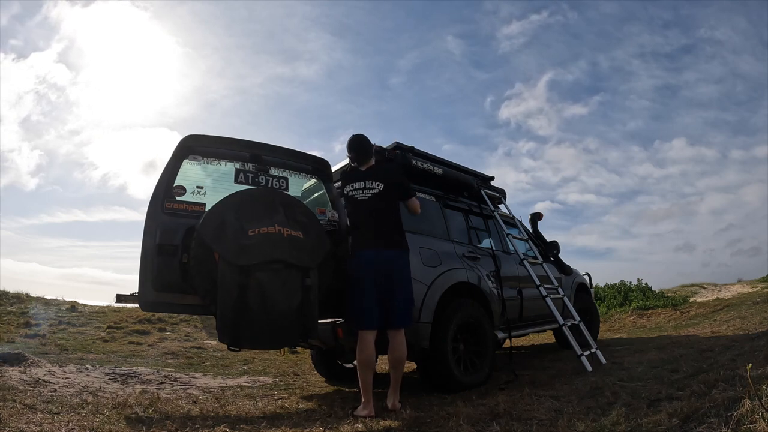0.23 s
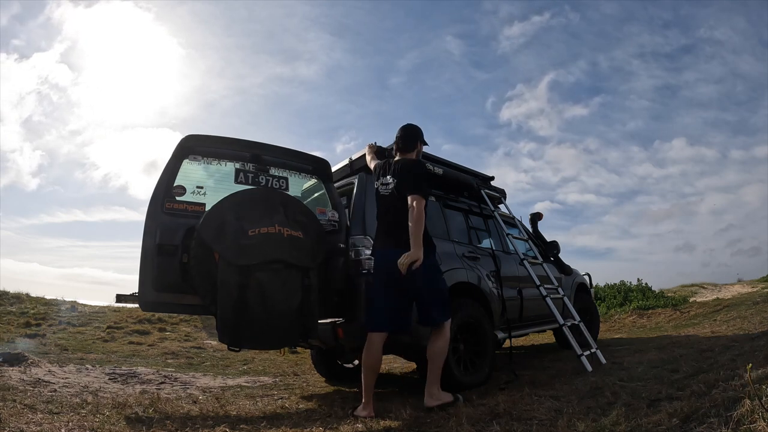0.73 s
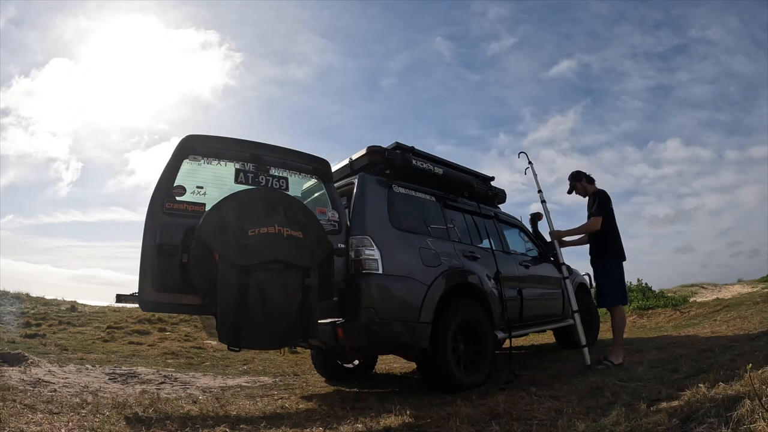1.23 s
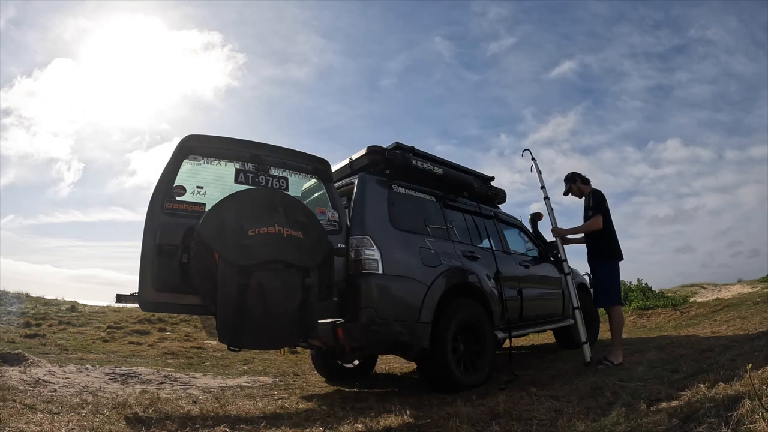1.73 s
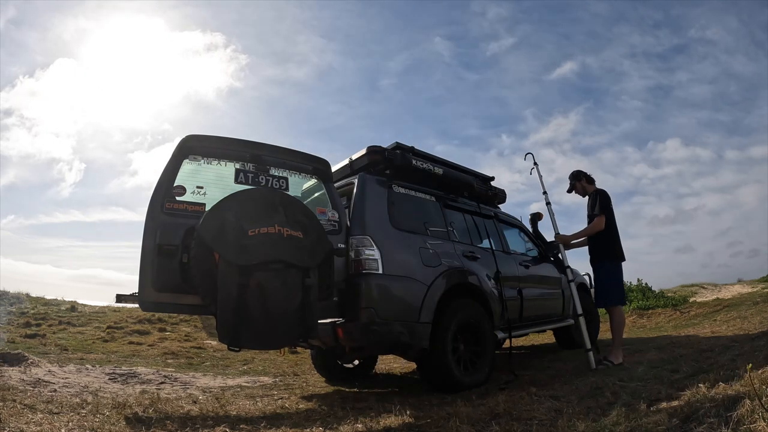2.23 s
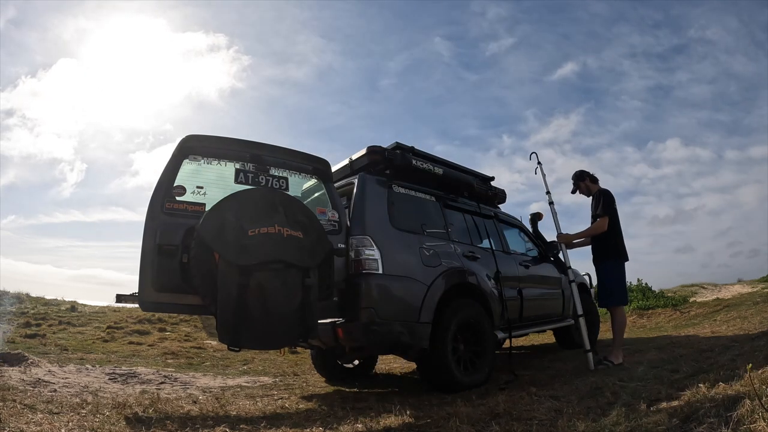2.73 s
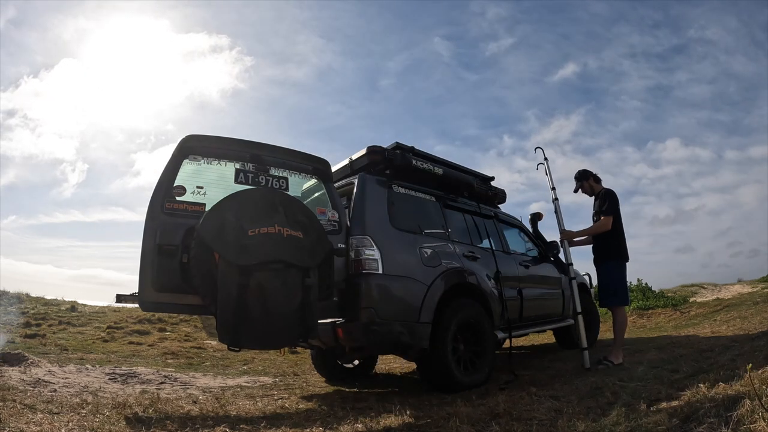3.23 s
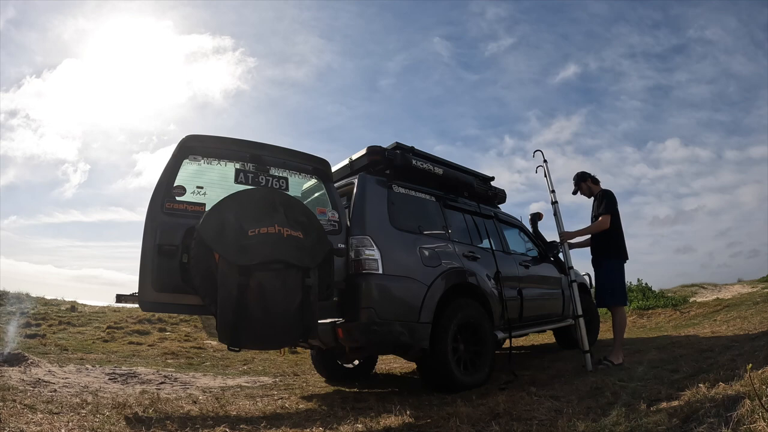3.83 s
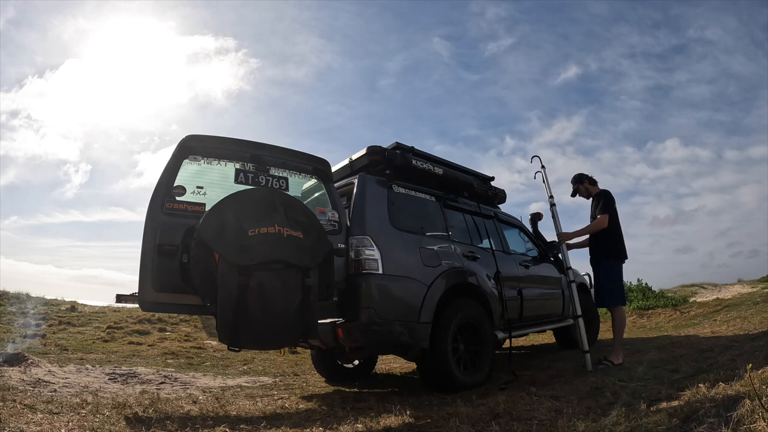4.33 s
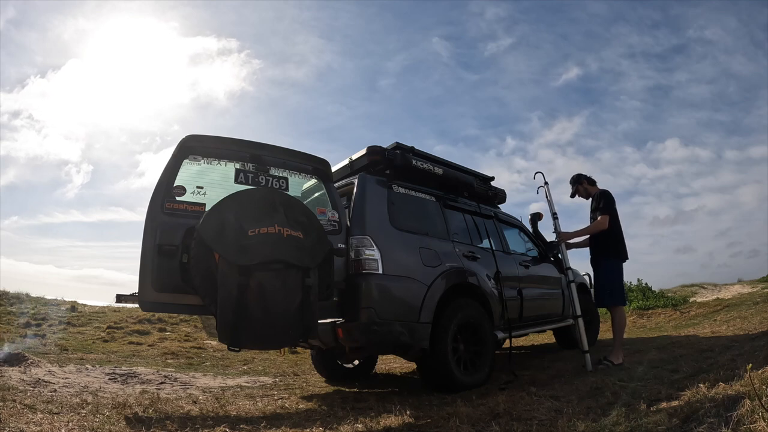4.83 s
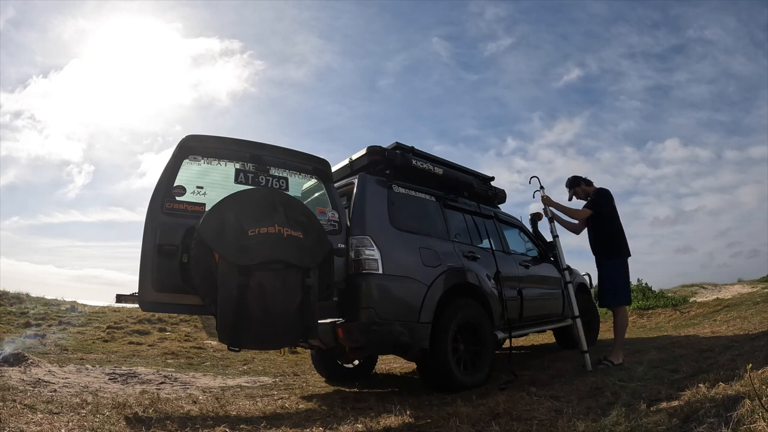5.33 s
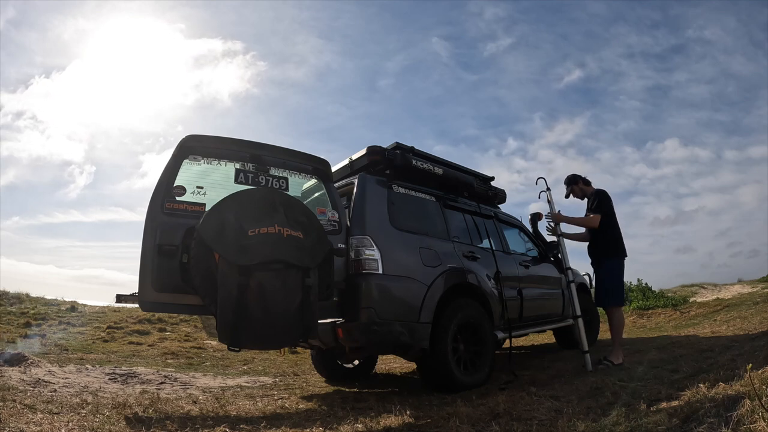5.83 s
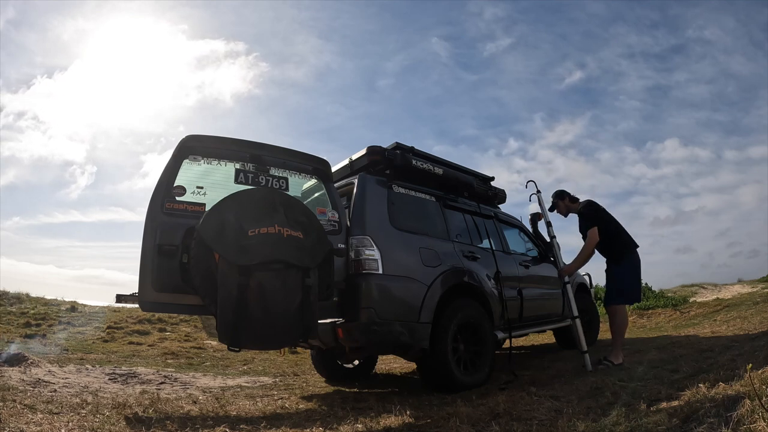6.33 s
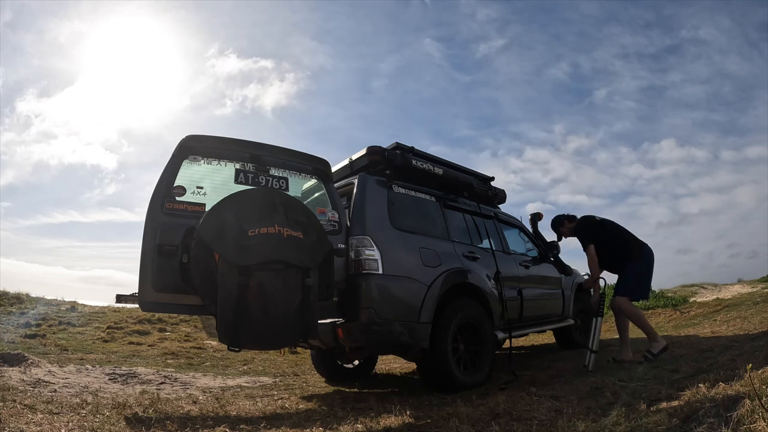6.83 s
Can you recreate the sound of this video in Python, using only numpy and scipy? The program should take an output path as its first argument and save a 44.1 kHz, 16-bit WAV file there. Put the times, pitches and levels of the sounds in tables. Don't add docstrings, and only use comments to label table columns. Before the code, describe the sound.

Outdoors, a small stereo microphone picks up low, lumpy wind rumble over a very faint distant hiss of grass and surf. At 0 s a car door shuts with a short hard thud; a thin insect buzz lies to the left and the wind gusts until an abrupt cut at 1.0 s. The wind drops and an aluminium telescopic ladder is collapsed, close and slightly right. Tubes scrape briefly, then slam with bright, dry, clicking clacks at about 1.2, 1.6, 2.0, 2.4, 2.8, 3.2 and 3.6 s, each trailed by snapping pins, loose rattle and tiny latch squeaks, with short echoes off the car. From 3.7 s only lighter taps remain, around 4.4 and 4.9 s, then a cluster of knocks at 5.4-5.6 s. Wind rises; another cut thumps softly at 6.4 s. Faint distant bird notes, gently falling in pitch, run from 6.6 s to the end at about 7.1 s.

```python
import sys
import numpy as np
from scipy import signal
from scipy.fft import rfft, irfft, next_fast_len
from scipy.io import wavfile
from scipy.ndimage import uniform_filter1d, map_coordinates

SR = 44100
rng = np.random.default_rng(int(sys.argv[2]) if len(sys.argv) > 2 else 0)


def makeup_ratio(level_db):
    decades = np.asarray(level_db, float) / 20
    return 10 ** decades


def wrap_up_sound(samples):
    columns = np.atleast_2d(samples).T
    tamed = np.clip(columns, -1, 1)
    steps = np.round(tamed * 32767).astype(np.int16)
    wavfile.write(sys.argv[1], SR, steps)


N = 313110

# time in seconds, level of the buffeting in dB.
WIND = [(0, -34.5), (.36, -39), (.46, -28), (.66, -35.5), (1, -32.5), (1.01, -44), (1.45, -45), (2.5, -47),
        (3.05, -44.5), (3.5, -41.5), (4.28, -48), (4.45, -42), (4.78, -45), (5.05, -40.5), (5.85, -38),
        (6.35, -35), (6.6, -34), (7.1, -42)]
# frequency in Hz, level in dB per Hz.
BUFFET = [(12, -26), (24, -6), (40, 0), (80, 0), (110, -9), (160, -30), (400, -120)]
# frequency in Hz, level in dB per Hz.
RUMBLE = [(20, -74), (50, -5), (90, -3.5), (160, -1.5), (210, -5), (320, -14.5), (460, -22.5), (750, -37),
          (1000, -77), (2000, -120)]
# frequency in Hz, likeness from 0 to 1.
BUFFET_ALIKE = [(30, .86), (70, .975)]
# frequency in Hz, likeness from 0 to 1.
RUMBLE_ALIKE = [(100, .994), (200, .996), (350, .988), (700, .93)]
RUMBLE_DB, RUMBLE_FOLLOWS, CALM_DB = -33.5, 0.38, -40
# time in seconds, level in dB.
FAR_HISS = [(0.0, -52), (2.39, -53.5), (7.1, -52.5)]
# frequency in Hz, level in dB per Hz.
HISS = [(600, -5), (800, -7), (1000, 1), (2000, -6.5), (3500, -13.5), (4300, -19.5), (5300, -29.5),
        (6800, -20), (8800, -32.5), (10500, -33.5), (12300, -43), (14000, -61), (16000, -89)]
# frequency in Hz, likeness from 0 to 1.
HISS_ALIKE = [(600, 0.78), (1400, 0.8), (3000, 0.57), (7000, .65), (12000, 0.28)]

# time in seconds, beats per second, level in dB.
WINGS = [
    (0, 220, -68.5),
    (.3, 250, -69),
    (.4, 250, -70.5),
    (.7, 360, -70.5),
    (1.004, 250, -65.5),
]
# frequency in Hz, level in dB per Hz.
INSECT = [(6500, -36), (8000, -9), (9300, -6), (10000, -4), (10900, -3), (12100, -27), (13200, -11),
          (14000, -25)]

# start in seconds, length in seconds, level in dB.
SLIDES = [(1.123, 0.25, -55), (1.54, 0.22, -49.5), (1.907, 0.19, -47), (2.308, 0.22, -49.5),
          (2.775, 0.16, -46.5), (3.19, 0.19, -56), (3.575, 0.21, -50), (4.305, 0.2, -53),
          (5.375, 0.22, -47.5), (4.44, 0.31, -54.5), (0, 0.06, -61)]
# frequency in Hz, level in dB per Hz.
RUB = [(900, -4), (2000, 4.5), (3500, -1), (5500, -10), (6800, -3), (8500, -14), (9600, -11), (13800, -21),
       (16000, -35)]

# start in seconds, tube level in dB, rung over tube in
# dB, basic fall time of the rattle in seconds, which each part lengthens.
SLAMS = [(.002, -14.5, -6.5, 0.013), (0.015, -37, 2, 0.072), (0.94, -31.5, -11, 0.0087),
         (1.1493, -31, -11, 0.036), (1.1915, -30, -3, 0.049), (1.2021, -24.5, -3.5, 0.088),
         (1.211, -24.5, 2.5, 0.029), (1.5976, -16.5, -4, 0.045), (1.605, -20, -7, 0.024),
         (1.9662, -22.5, -2, 0.085), (1.9724, -12, -5, 0.029), (2.3646, -18, -19, 0.075),
         (2.378, -18, 0, 0.016), (2.7891, -15, -5.5, 0.04), (2.7967, -18.5, -1, 0.027),
         (3.2148, -25.5, -4.5, 0.08), (3.231, -17, -1, 0.04), (3.237, -15, -2, 0.0098),
         (3.6181, -16.5, -5, 0.037), (3.6244, -19, -2.5, 0.05), (4.3617, -42, 3, 0.012),
         (4.435, -37, -3, 0.04), (4.8984, -35, -8, 0.027), (5.464, -36, -4, 0.036),
         (5.5621, -30, -26, 0.035)]
SLAM_PIN_DB, SLAM_LATCH_DB = -11.5, -6.5
# start in seconds, pin level in dB, latch over pin in dB, tube over pin in dB.
SNAPS = [(1.211, -20.5, 1.5, -29), (1.223, -24, -5, 0), (1.2633, -33.5, 4, 2), (1.3063, -35, 3, 2),
         (1.6057, -18.5, -23, -33), (1.6158, -21, -2.5, -12), (1.665, -27.5, -5, -6), (1.6935, -35, 0, -17),
         (1.6988, -22.5, -12, -20), (1.7147, -35, 7.5, 3), (1.984, -14, -9, -20), (2.006, -28, -7, -11),
         (2.0245, -20.5, -5, -16), (2.066, -29, -7.5, -1.5), (2.335, -32, 3.5, -8), (2.378, -23.5, 6.5, -3),
         (2.391, -22, -4, -18), (2.4686, -21.5, -11, -8), (2.473, -32, -16, -2), (2.797, -17.5, 1.5, -18),
         (2.8042, -19, -10, -14), (2.877, -30.5, -1, -12), (2.8896, -33.5, -1, -1), (3.2305, -40, 16, -11),
         (3.279, -30, 10.5, 5.5), (3.2835, -31, -5, -2.5), (3.6251, -19.5, 2.5, -9),
         (3.633, -33.5, 10.5, -6), (5.562, -44.5, 20, -16), (5.568, -34.5, 2, -6)]
SNAP_RUNG_DB = -5.5
SNAP_T60 = 0.017
SNAP_CRACK, CRACK_S = 0.97, 0.00042
# start in seconds,
# tube level in dB, small parts over tube in dB, basic fall time of the rattle in seconds, which each part
LIGHT_KNOCKS = [(1.1432, -41, -3, 0.016), (1.233, -39, -5, 0.15), (1.2812, -34, -4, 0.038),
                (1.549, -44, -0.5, 0.056), (1.566, -39, 2, 0.012), (1.637, -39.5, -2.5, 0.12),
                (1.6855, -36, -11, 0.039), (1.903, -45, 3, 0.05), (1.915, -37.5, -1, 0.04),
                (1.944, -33.5, -4, 0.016), (1.985, -29, -6, 0.026), (2.0387, -40, -1, 0.12),
                (2.078, -35, -4.5, 0.016), (2.313, -33.5, -13, 0.0066), (2.4042, -32.5, -1, 0.1),
                (2.417, -43, 10.5, .026), (2.429, -41.5, 7, 0.049), (2.451, -32.5, 3, 0.028),
                (2.815, -36.5, -15, .09), (2.834, -50, -11, .07), (2.8505, -42, 8, 0.045),
                (2.8635, -41, -14, 0.043), (3.141, -42, -10, .012), (3.181, -36.5, -9, 0.034),
                (3.225, -25.5, 1.5, 0.086), (3.298, -35.5, 2.5, 0.047), (3.337, -37, -5, 0.044),
                (3.642, -45, -10, .032), (3.669, -36, 1, 0.036), (3.728, -36.5, -3, 0.03),
                (.0091, -39, -2, 0.013), (2.7225, -48, -10, 0.023), (2.8814, -49, -3, .021), (3.598, -42, -4, .023),
        (3.6485, -36, -5, 0.054), (3.7483, -41, -4, 0.0045), (4.009, -41, -5.5, 0.019),
        (4.3251, -38.5, -13, 0.026), (4.347, -53, -4, .011), (4.393, -43, -7, 0.03),
        (4.4223, -30.5, -7.5, 0.028), (4.7173, -54, 6.5, 0.01), (4.894, -27.5, -14.5, 0.013),
        (5.397, -44, 1, 0.023), (5.436, -29, -5, 0.021), (5.485, -36, -6, .02),
        (5.4891, -23.5, -6.5, 0.023), (5.6276, -43, -9, .009), (5.641, -44, 3, 0.012),
        (5.855, -43, -6.5, .016), (6.768, -52.5, 1.5, 0.032)]
LOOSE_RUNG_DB, LOOSE_LATCH_DB = -4.5, -1
# frequency in Hz, width in Hz, level in dB.
RUNG = [(984, 160, -9.5), (1450, 320, -2.5), (495, 194, -8)]
# frequency in Hz, width in Hz, level in dB.
TUBE = [(1990, 1130, -2), (2337, 200, 3.5), (2560, 180, -4.5), (2893, 176, 7), (3040, 610, 1),
        (4040, 610, -3)]
# frequency in Hz, width in Hz, level in dB.
PIN = [(3990, 230, -4.5), (4430, 490, 0), (4730, 110, -7), (4800, 350, -3.5)]
# frequency in Hz, width in Hz, level in dB.
LATCH = [(6060, 710, -2.5), (7090, 1050, 5), (7130, 474, 7.5), (7850, 150, -19.5), (10300, 1800, -9.5),
         (11730, 240, -9), (12300, 1700, -21)]
SNAP_TOP_HZ, SLAM_TOP_HZ = 9400, 19100

# start in
# seconds, frequency in Hz, level in dB, time to fall 60 dB in seconds.
METAL_RINGS = [(0.0056, 1290, -12, 0.011), (0.0092, 2120, -27, 0.021), (1.1942, 3940, -26, 0.02),
               (1.2105, 6320, -25, 0.023), (1.2128, 10900, -30, 0.012), (1.216, 4370, -24, 0.018),
               (1.225, 4300, -22, 0.02), (1.606, 3900, -13, 0.012), (1.607, 1440, -32, 0.021),
               (1.611, 9560, -39, 0.021), (1.9719, 3810, -16, 0.016), (1.9738, 8380, -29, 0.022),
               (1.9747, 6780, -30, 0.03), (1.9847, 4480, -22, 0.012), (1.9856, 10300, -32, 0.025),
               (1.9947, 11240, -48, 0.025), (2.366, 1420, -18, 0.012), (2.3738, 5020, -24, 0.025),
               (2.3752, 3460, -17.5, 0.021), (2.3766, 7160, -27, 0.012), (2.3893, 2554, -30, 0.089),
               (2.7906, 6500, -31, 0.015), (2.7964, 1087, -24, 0.042), (2.7974, 10980, -34, 0.019),
               (2.7988, 7700, -26, 0.012), (2.805, 4440, -22, 0.012), (3.2174, 3370, -32, 0.073),
               (3.2174, 1560, -33, 0.072), (3.2301, 4200, -19, 0.012), (3.2333, 3330, -21.5, 0.06),
               (3.623, 2720, -18, 0.014), (3.626, 6300, -26, 0.012), (3.63, 7130, -27, 0.027),
               (3.631, 3290, -23, 0.026), (3.6437, 4330, -30, 0.023),
               (1.1543, 7700, -42, 0.038), (1.2464, 1350, -34, 0.015), (1.2654, 9200, -39, 0.029),
               (1.2664, 4950, -34, 0.018), (1.3057, 7050, -30, 0.019), (1.6727, 5990, -33, 0.014),
               (1.7153, 7210, -34, 0.012), (1.7162, 1370, -39, 0.032), (1.7167, 4400, -30, 0.016),
               (1.9149, 7800, -44, 0.026), (1.9503, 4440, -35, 0.02), (2.0101, 2560, -37, 0.055),
               (2.0255, 4314, -21, 0.028), (2.0255, 10600, -35, 0.013), (2.0732, 4720, -35, 0.019),
               (2.0777, 3680, -38, 0.048), (2.4063, 3100, -23, 0.012), (2.4323, 4950, -34, 0.037),
               (2.4364, 7130, -41, 0.02), (2.4514, 2220, -36, 0.036), (2.4687, 4420, -21, 0.027),
               (2.469, 2930, -19.5, 0.01), (2.854, 2560, -40, 0.1), (2.8809, 6240, -30, 0.019),
               (2.8831, 4340, -38, 0.055), (3.2573, 3240, -30, 0.017), (3.2792, 2560, -28, 0.032),
               (3.294, 2660, -42, 0.096), (3.597, 7940, -37, 0.014), (3.669, 3290, -32.5, 0.064),
               (3.6713, 1420, -33, 0.022), (3.7094, 7160, -40, 0.023), (4.013, 6120, -46, 0.037),
               (4.4246, 3370, -30, 0.014), (4.426, 1240, -29, 0.014), (4.436, 1490, -31, 0.018),
               (4.8958, 1427, -33, 0.033), (5.4396, 2900, -31.5, 0.024), (5.4478, 1680, -41, 0.034),
               (5.412, 9400, -46, 0.02), (1.549, 3270, -43, 0.056), (5.642, 7100, -39, 0.018),
               (5.4664, 1830, -29, 0.02), (5.494, 2610, -19.5, 0.012), (5.494, 5030, -28.5, 0.036),
               (5.504, 4940, -32, 0.026), (5.563, 2990, -29, 0.017), (5.5693, 4630, -28, 0.018),
               (1.599, 3700, -22, 0.045), (1.6, 1412, -29, .05), (1.616, 6100, -23, 0.027),
              (1.969, 3040, -30, 0.056), (1.976, 2294, -24, 0.045), (1.976, 1470, -23, 0.025),
              (2.367, 3000, -27, .06), (2.376, 1027, -28, 0.044), (2.788, 2910, -28, 0.056),
              (2.797, 3270, -28, 0.13), (2.799, 6200, -26, 0.034), (3.238, 1500, -28, 0.016),
              (3.231, 6600, -32, .03), (3.23, 9600, -25.5, 0.021), (3.6238, 1090, -19, 0.042),
              (3.628, 1360, -22, .05), (3.618, 2560, -28, 0.055), (4.8945, 2370, -32.5, 0.037),
              (4.898, 2950, -41, 0.037), (5.49, 1630, -27, 0.022), (5.563, 7900, -28, 0.013),
              (4.426, 2960, -35, .04)]
RING_RISE_S, RING_DB = 0.00031, 1

# start in seconds,
# length in seconds, level in dB.
RUSTLES = [(0.895, 0.018, -58), (1.51, .04, -71), (2.08, 0.047, -70), (2.24, 0.091, -65),
           (2.492, 0.046, -63), (2.741, 0.023, -63), (3.582, 0.019, -55), (3.968, .025, -62),
           (4.128, 0.025, -66), (4.19, .015, -66), (4.874, 0.011, -63), (4.915, 0.011, -67),
           (5.357, .04, -70), (5.58, 0.051, -63), (5.697, 0.0088, -72), (6.475, 0.45, -81), (6.78, .3, -82),
           (6.641, 0.017, -72), (6.69, 0.017, -70), (4.623, .125, -60.5), (6.956, 0.0085, -67),
           (6.978, 0.01, -64), (6.986, 0.011, -72), (7.024, .012, -69)]

# start in seconds, length in seconds, frequency in Hz, level in dB.
SQUEAKS = [(1.106, .016, 7900, -69), (1.151, 0.018, 7800, -47), (1.408, 0.045, 2375, -54.5),
           (1.55, .025, 8000, -48), (1.878, .025, 8000, -58), (1.912, .012, 8000, -47),
           (2.478, .035, 4100, -53), (3.181, .015, 7900, -45), (3.563, .02, 7860, -51),
           (3.585, .0088, 7850, -50), (3.596, .0065, 7860, -39), (3.672, 0.021, 3290, -48),
           (4.003, 0.034, 6200, -55), (4.577, .013, 5000, -55), (4.601, 0.012, 4980, -49),
           (4.615, 0.04, 4920, -57), (4.633, 0.014, 1945, -46), (6.97, 0.013, 3280, -54)]
OVERTONE_DB, OVERTONE_FADE_DB_PER_KHZ = 8, 4.5

# start in seconds, peak level in dB.
CLICKS = [(1.305, -23), (1.6172, -9), (1.6226, -15), (1.6395, -29), (1.6653, -29), (1.6933, -22),
          (1.6998, -19), (1.7151, -23), (1.9844, -9), (2.0051, -21), (2.025, -8.5), (2.0388, -27),
          (2.3911, -9.5), (2.4075, -25), (2.4198, -21), (2.4688, -14), (2.804, -11), (2.8784, -27),
          (2.8905, -17.5), (3.2803, -18), (3.2997, -29), (3.3376, -26), (3.6427, -22), (3.6685, -29),
          (3.7482, -21), (4.7191, -43)]
# frequency in Hz, width in Hz, level in dB.
CLICK_MODES = [(4440, 860, -3), (5700, 990, 1.5), (7160, 1050, 0)]
CLICK_DB = -2.5

# start in seconds, length in seconds, level in dB.
BIRD = [
    (6.61, .03, -65),
    (6.67, .045, -63),
    (6.735, .045, -65),
    (6.86, 0.05, -63),
    (6.91, 0.061, -62),
    (6.973, .07, -59),
    (7.04, 0.06, -61),
]
BIRD_HZ, BIRD_SAG_HZ_PER_S = 2820, 675

# frequency in Hz, time to fall 60 dB in seconds.
CAR_SIDE = [(500, 0.031), (3000, 0.087), (10000, 0.033)]
# frequency in Hz, left over right in dB.
PORT_PAN = [(700, -1.8), (2400, -4), (4400, -4), (8000, -3), (13000, 1.2)]
# frequency in Hz, phase by which left leads in radians.
PORT_LAG = [(300, 0.39), (1600, -0.51), (3000, -0.68), (5000, -0.71), (6500, -0.11), (10000, 0.056),
            (14000, 1)]
# frequency in Hz, level in dB.
TOP = [(14000, 1.5), (14700, -10), (15700, -23), (15900, -100)]
# time in seconds, jump in the waveform at full scale 1.
CUTS = [
    (1.005, 0.028),
    (6.4035, -0.12),
]


def unit(x):
    return x / np.sqrt(np.mean(x ** 2, axis=-1, keepdims=True) + 1e-20)


def along(points, hz):
    f, v = np.transpose(points)
    return np.interp(np.log(hz + 1), np.log(f + 1), v)


def curves(rows):
    s, *columns = np.transpose(rows)
    return [np.interp(np.arange(N) / SR, s, column) for column in columns]


def wobble(rate):
    knots = rng.standard_normal(int(N * rate / SR) + 4)
    return map_coordinates(knots, [np.arange(N) * rate / SR])


def filtered(x, response):
    m = next_fast_len(x.shape[-1] + 4096)
    spectrum = rfft(x, m) * response(np.fft.rfftfreq(m, 1 / SR))
    return irfft(spectrum, m)[..., :x.shape[-1]]


def resonances(modes, scatter_db=0):
    shift = np.broadcast_to(scatter_db, np.shape(scatter_db)[:1] + (len(modes),))

    def response(f):
        total = 0
        for k, (centre, width, db) in enumerate(modes):
            peak = 1j * f * width / (centre * centre - f * f + 1j * f * width)
            total = total + (-1) ** k * makeup_ratio(db + shift[..., k, None]) * peak
        return total
    return response


def place(times, sounds):
    at = np.round(np.asarray(times) * SR).astype(int)[:, None] + np.arange(sounds.shape[1])
    return np.bincount(at.ravel(), sounds.ravel(), N + SR)[:N]


def swell(length, edge=0.55, lean=1):
    t = np.arange(SR // 3) / SR
    progress = np.clip(t / np.asarray(length)[:, None], 0, 1)
    return np.abs(np.sin(np.pi * progress ** lean)) ** edge, t


def rush(spectrum, alike, patchy_db):
    z = signal.stft(rng.standard_normal((2, N)), nperseg=512)[2]
    field = uniform_filter1d(rng.standard_normal(z.shape[1:]), size=6, axis=0)
    field = uniform_filter1d(field, size=14, axis=1)
    patchy = z * makeup_ratio(patchy_db * field / field.std())
    pair = signal.istft(patchy, nperseg=512)[1][:, :N]

    def mid_side(hz):
        turn = np.arccos(np.clip(along(alike, hz), -1, 1)) / 2
        return makeup_ratio(along(spectrum, hz)) * [np.cos(turn), np.sin(turn)]
    mid, side = filtered(pair, mid_side)
    return unit(np.array([mid + side, mid - side]))


def wind():
    buffet_db, = curves(WIND)
    hiss_db, = curves(FAR_HISS)
    rumble_db = RUMBLE_DB + RUMBLE_FOLLOWS * (buffet_db - CALM_DB)
    buffet_gain = makeup_ratio(buffet_db + 1.2 * wobble(5) + 0.8 * wobble(9))
    buffet = buffet_gain * rush(BUFFET, BUFFET_ALIKE, patchy_db=0.5)
    rumble = makeup_ratio(rumble_db + 1.05 * wobble(14)) * rush(RUMBLE, RUMBLE_ALIKE, patchy_db=-0.56)
    hiss = makeup_ratio(hiss_db + 0.5 * wobble(7.0)) * rush(HISS, HISS_ALIKE, patchy_db=-1.65)
    return buffet + rumble + hiss * makeup_ratio([[0.6], [-0.6]])


def insect():
    rate, db = curves(WINGS)
    beat = 2 * np.pi * np.cumsum(rate) / SR
    gate = 1.6 + np.exp(1.4 * np.cos(beat) + 0.7 * np.cos(beat / 2))
    puffs = gate * rng.standard_normal((2, N))
    buzz = unit(filtered(puffs, lambda hz: makeup_ratio(along(INSECT, hz))))
    present = np.arange(N) < CUTS[0][0] * SR
    return makeup_ratio(db + [[3.5], [-5]]) * buzz * present


def slides():
    s, length, db = np.transpose(SLIDES)
    strokes = place(s, makeup_ratio(db)[:, None] * swell(length, edge=0.7, lean=0.75)[0])
    clumps = makeup_ratio(1.1 * wobble(40) + 1.5 * wobble(200) + 3 * wobble(800))
    grit = rng.standard_normal(N) * clumps
    return strokes * unit(filtered(grit, lambda hz: makeup_ratio(along(RUB, hz))))


def blows():
    hits = []
    for s, db, rung, t60 in SLAMS:
        hits.append((s, db + rung, db, db + SLAM_PIN_DB, db + SLAM_LATCH_DB, t60, 0))
    for s, db, latch, tube in SNAPS:
        hits.append((s, db + tube + SNAP_RUNG_DB, db + tube, db, db + latch, SNAP_T60, SNAP_CRACK))
    for s, db, small, t60 in LIGHT_KNOCKS:
        hits.append((s, db + LOOSE_RUNG_DB, db, db + small, db + small + LOOSE_LATCH_DB, t60, 0))
    return hits


def contacts():
    s, *levels, t60, crack = np.transpose(blows())
    t = np.arange(SR // 10) / SR
    top_hz = np.where(crack > 0, SNAP_TOP_HZ, SLAM_TOP_HZ)[:, None]
    blow = 1 + crack[:, None] * np.exp(-t / CRACK_S)
    parts = (RUNG, TUBE, PIN, LATCH)
    out = 0
    for modes, db, lasting in zip(parts, levels, (1.54, 1.59, 1.53, 1.24)):
        fall = makeup_ratio(-60 * t / (lasting * np.abs(t60)[:, None] + 0.011))
        fall = fall * (1 - 0.54 * np.exp(-t / 0.00075))
        spikes = rng.standard_normal(fall.shape) * makeup_ratio(7.6 * rng.standard_normal(fall.shape))
        body = resonances(modes, 1.8 * rng.standard_normal((len(s), len(modes))))
        highest = max(modes)[0]

        def part(hz):
            above_modes = (1 + 1j * hz / (1.86 * highest)) ** 2
            dullness = (1 + 1.3j * hz / top_hz - (hz / top_hz) ** 2) ** 2
            return body(hz) / above_modes / dullness
        ring = filtered(blow * fall * spikes, part)
        ring /= np.std(ring[:, :SR // 300], axis=1, keepdims=True)
        out = out + place(s, makeup_ratio(db - 9.5)[:, None] * ring)
    return out


def rings():
    s, hz, db, t60 = np.transpose(METAL_RINGS)[..., None]
    t = np.arange(SR // 10) / SR
    rise = 1 - np.exp(-t / RING_RISE_S)
    fall = makeup_ratio(db + RING_DB - 60 * t / np.maximum(t60, 0.005))
    return place(s[:, 0], rise * fall * np.sin(2 * np.pi * hz * t))


def rustles():
    s, length, db = np.transpose(RUSTLES)
    puffs = place(s, makeup_ratio(db)[:, None] * swell(length, edge=0.73, lean=0.55)[0])
    puffs = puffs * makeup_ratio(1.4 * wobble(180))
    bright = resonances([(4030, 700, 1), (7200, 1000, -5.5), (10300, 1600, -7.5)])
    return puffs * unit(filtered(rng.standard_normal(N), bright))


def squeaks():
    s, length, hz, db = np.transpose(SQUEAKS)
    window, t = swell(length, edge=0.74, lean=0.65)
    drift = 0.035 * np.cumsum(rng.standard_normal(window.shape), axis=1)
    turn = 2 * np.pi * hz[:, None] * t + drift
    richness = makeup_ratio(OVERTONE_DB - OVERTONE_FADE_DB_PER_KHZ * hz / 1000)[:, None]
    tone = np.sin(turn) + richness * (np.sin(2 * turn) + 0.32 * np.sin(3 * turn))
    return place(s, makeup_ratio(db - 2.0)[:, None] * window * tone)


def clicks():
    s, db = np.transpose(CLICKS)
    body = resonances(CLICK_MODES)

    def small_parts(hz):
        thin_bass = 1j * hz / (3000 + 1j * hz)
        soft_treble = 1 + 1j * hz / 9000 - (hz / 9000) ** 2
        return body(hz) * thin_bass / soft_treble
    click = filtered(np.arange(SR // 50) == 0, small_parts)
    return place(s, makeup_ratio(db + CLICK_DB)[:, None] * click / np.abs(click).max())


def bird():
    s, length, db = np.transpose(BIRD)
    hz = BIRD_HZ - BIRD_SAG_HZ_PER_S * (s - s[0])
    window, t = swell(length, edge=1.2)
    drift = 0.05 * np.cumsum(rng.standard_normal(window.shape), axis=1)
    warble = 1.0 * np.sin(2 * np.pi * 45 * t)
    note = np.sin(2 * np.pi * hz[:, None] * t + drift + warble)
    return place(s, makeup_ratio(db + 4.5)[:, None] * window * note)


def car_side(x):
    hz, t, z = signal.stft(rng.standard_normal((2, SR // 6)), SR, nperseg=128)
    fall = makeup_ratio(-60 * t / along(CAR_SIDE, hz)[:, None])
    tail = signal.istft(z * fall, SR, nperseg=128)[1]
    tail = filtered(tail, lambda hz: 1 + 1j * hz / 7000)
    return signal.fftconvolve(x[None], unit(tail) / np.sqrt(tail.shape[1]), axes=1)[:, :N]


def scene():
    ladder = slides() + contacts() + rings() + rustles() + squeaks() + clicks()
    side = np.array([[0.5], [-0.5]])

    def ports(hz):
        return makeup_ratio(side * along(PORT_PAN, hz)) * np.exp(1j * side * along(PORT_LAG, hz))
    direct = filtered(ladder, ports)
    echoes = makeup_ratio(-10) * car_side(ladder)
    far_bird = bird() * makeup_ratio([[1.2], [-1.2]])
    return wind() + insect() + direct + echoes + far_bird


def roll_off(x):
    return signal.sosfilt(signal.butter(12, 15720, fs=SR, output="sos"), x)


def record(dry):
    out = filtered(dry, lambda hz: makeup_ratio(along(TOP, hz)))
    for s, jump in CUTS:
        t = (np.arange(N) - round(s * SR) + 0.5) / SR
        out += jump / 2 * np.sign(t) * np.exp(-np.abs(t) / 0.0053)
    return roll_off(out)


dry = scene()
out = record(dry)
wrap_up_sound(out)
```